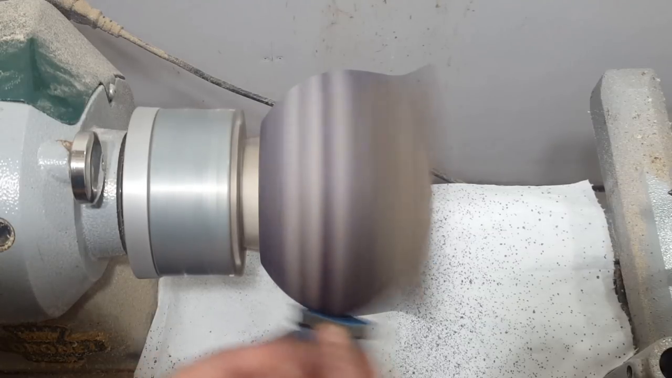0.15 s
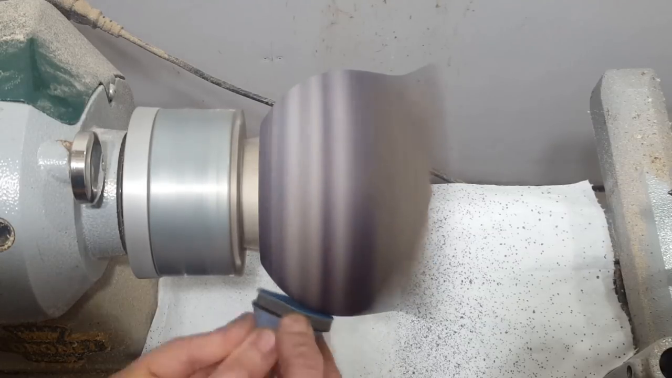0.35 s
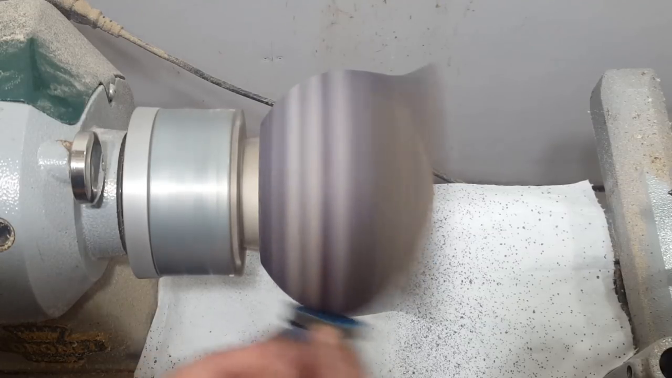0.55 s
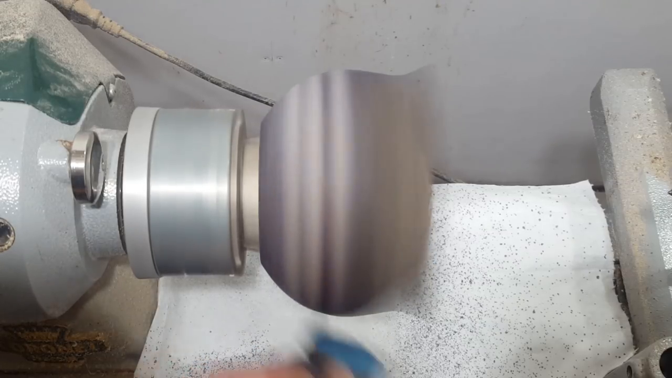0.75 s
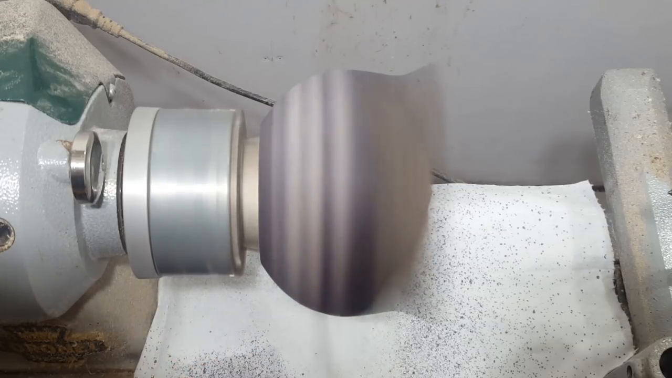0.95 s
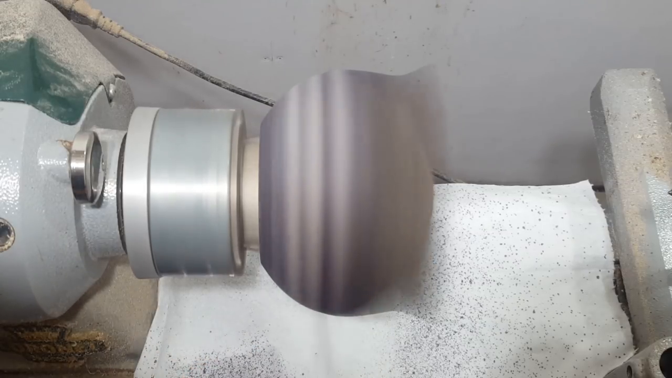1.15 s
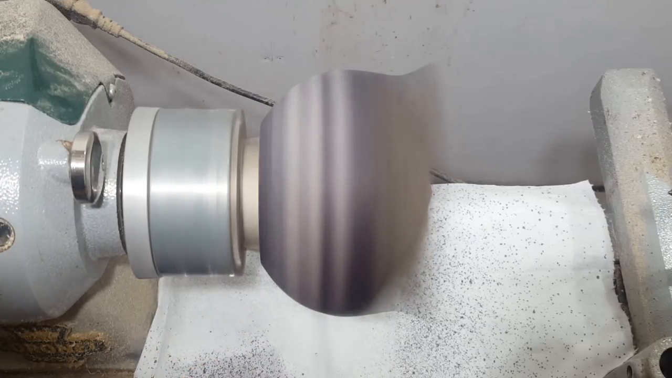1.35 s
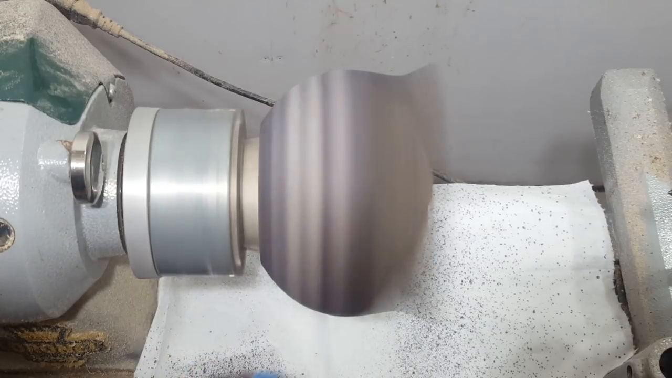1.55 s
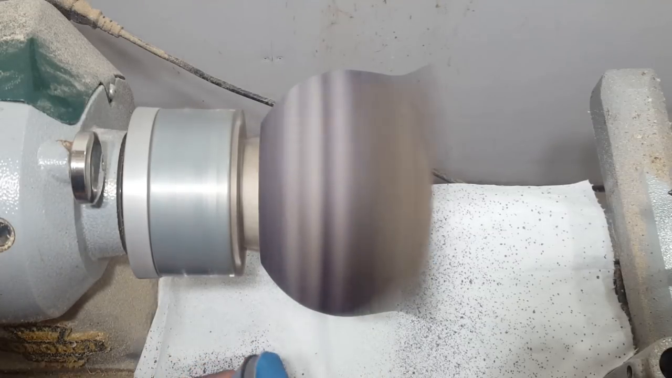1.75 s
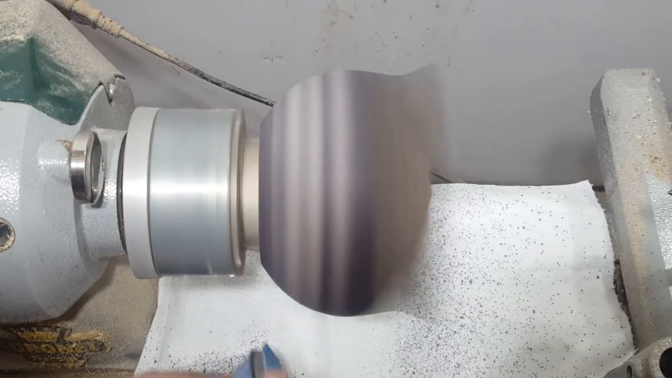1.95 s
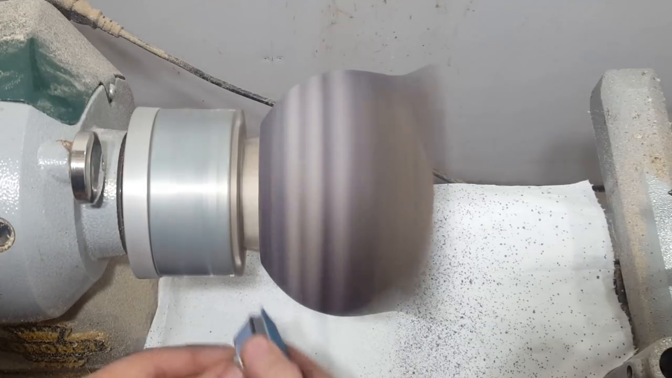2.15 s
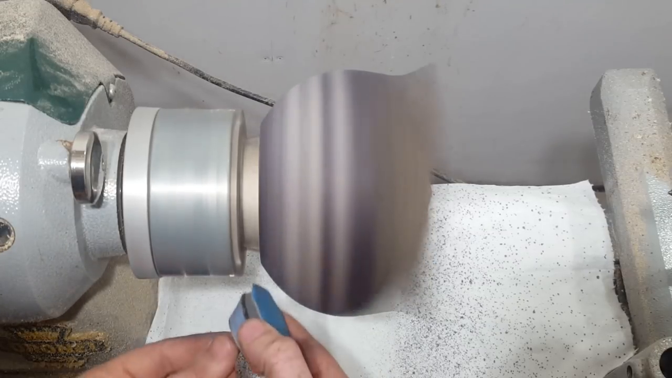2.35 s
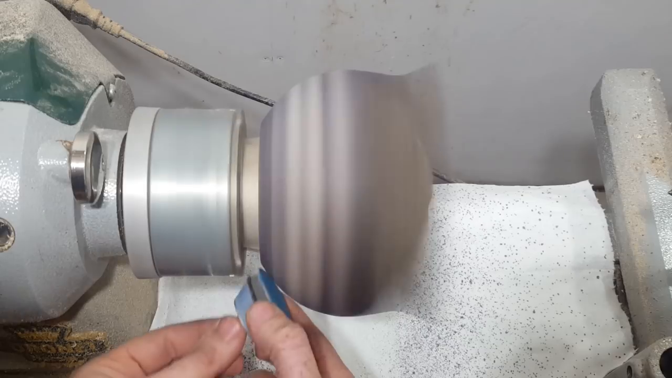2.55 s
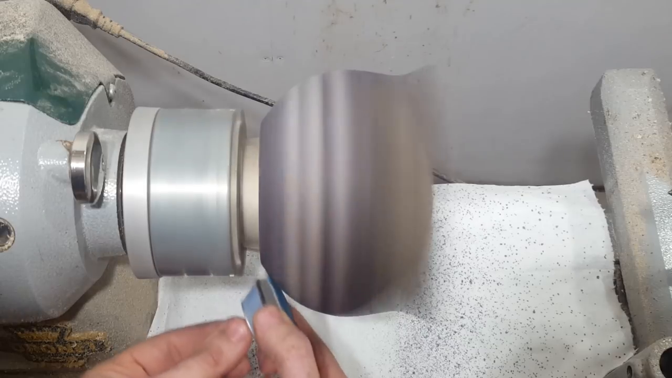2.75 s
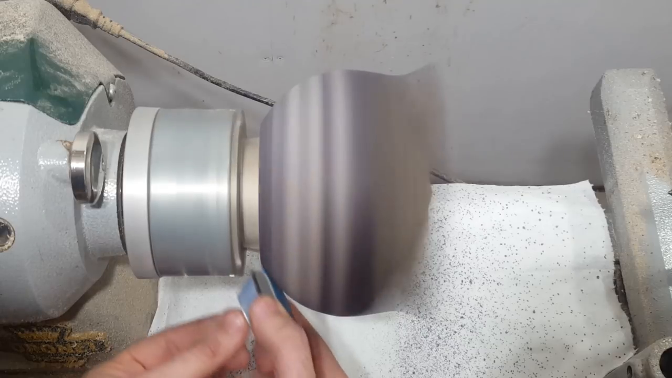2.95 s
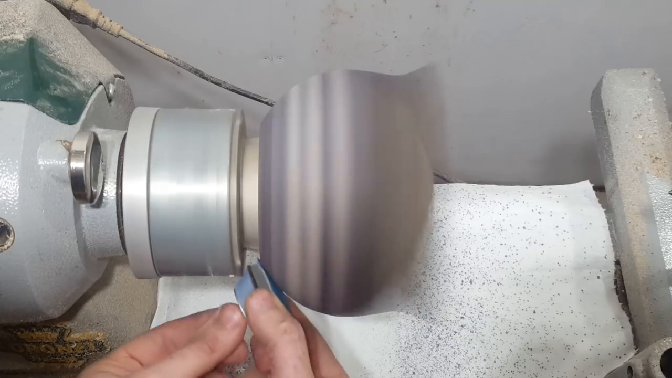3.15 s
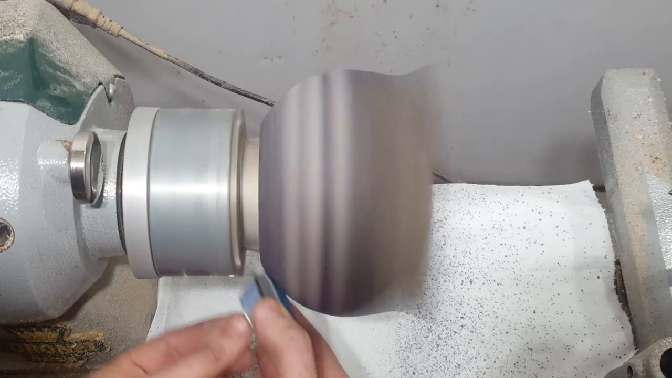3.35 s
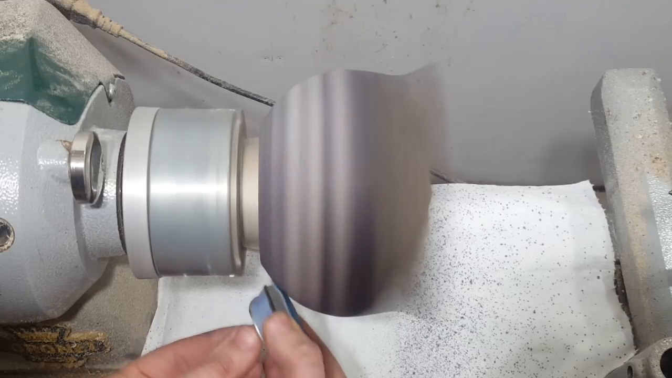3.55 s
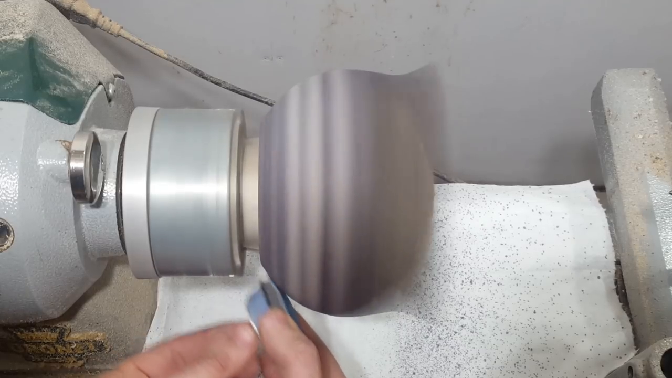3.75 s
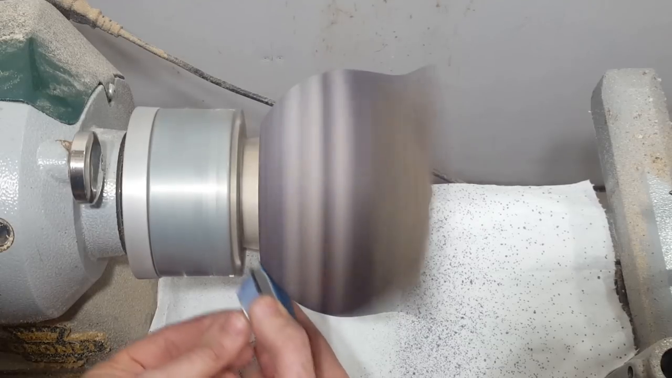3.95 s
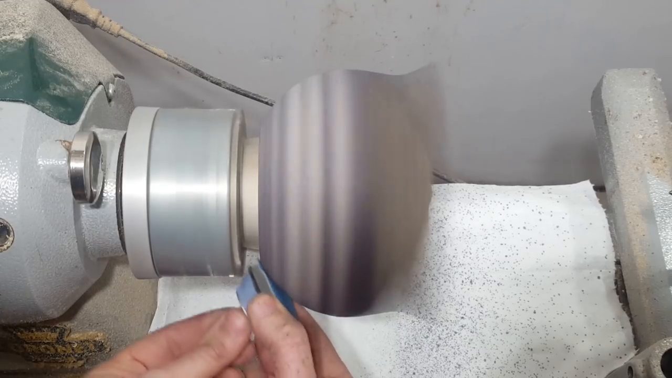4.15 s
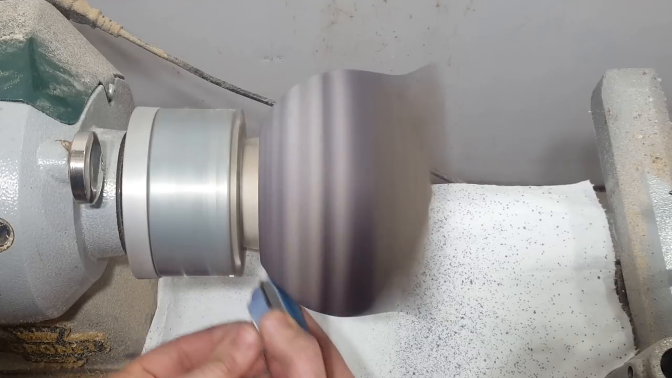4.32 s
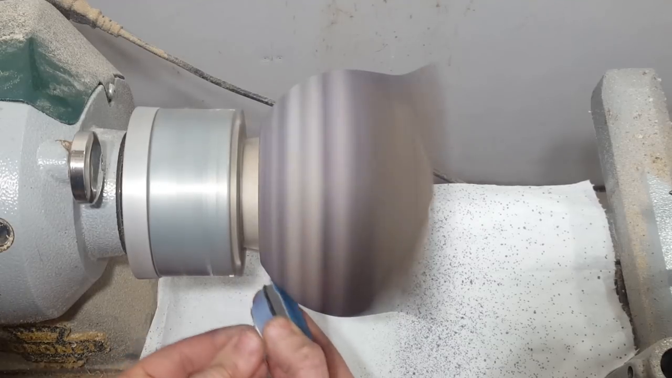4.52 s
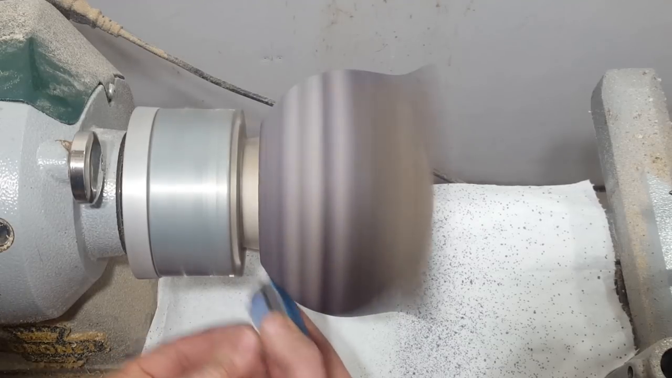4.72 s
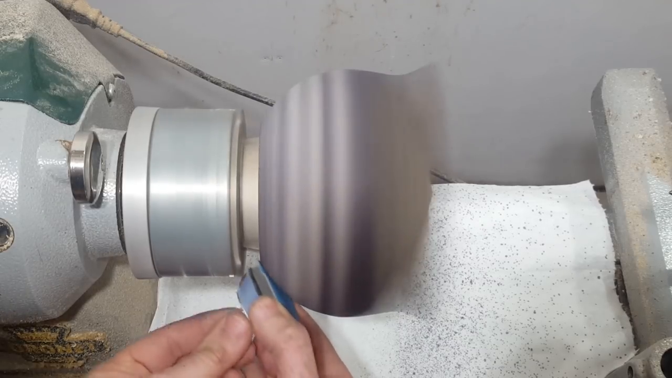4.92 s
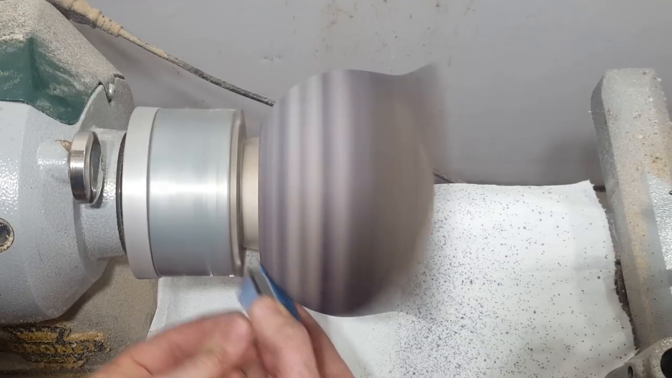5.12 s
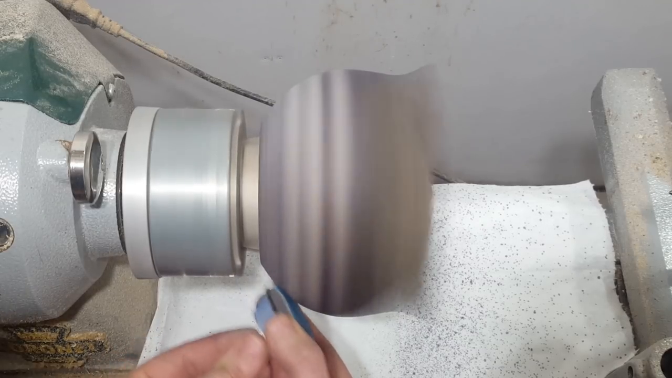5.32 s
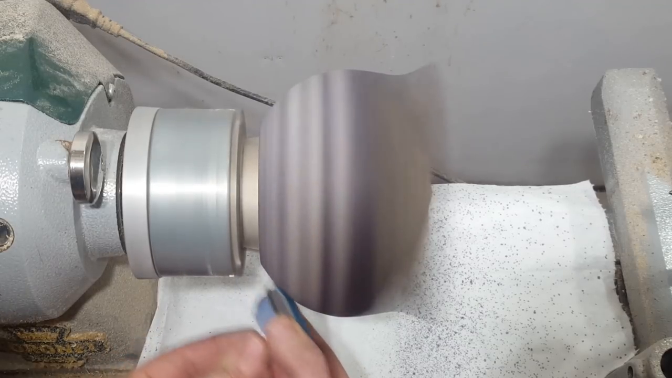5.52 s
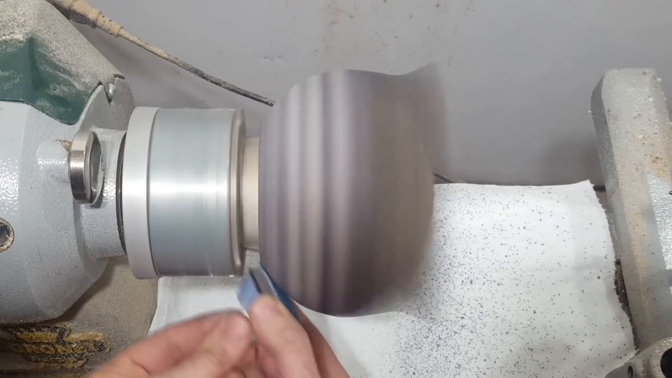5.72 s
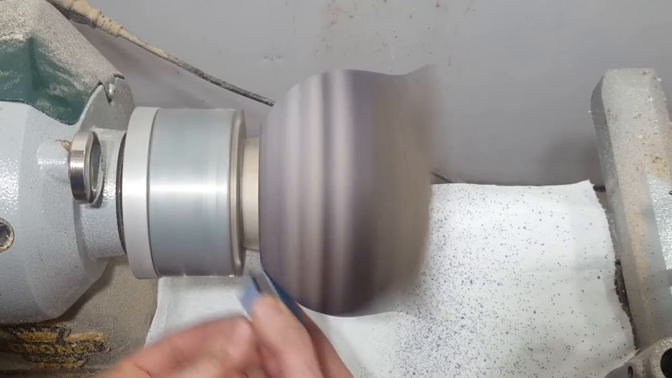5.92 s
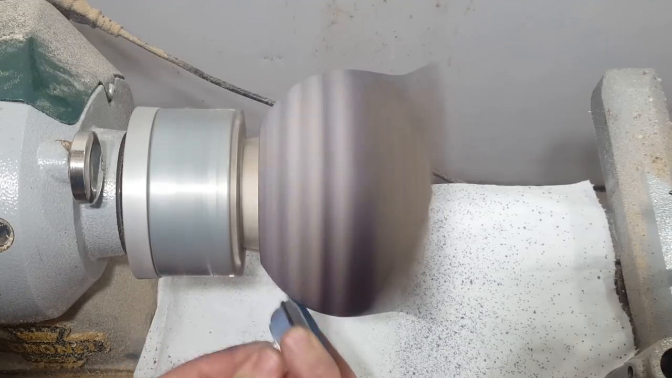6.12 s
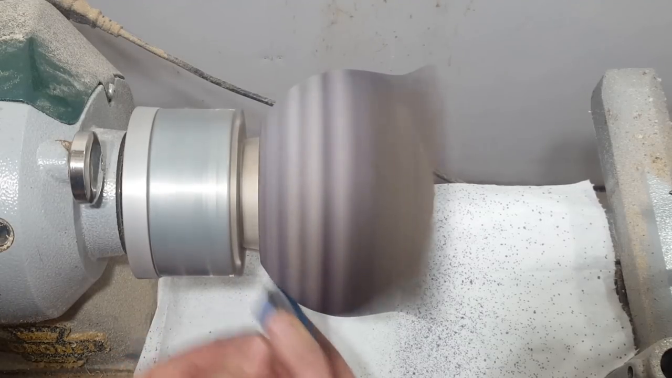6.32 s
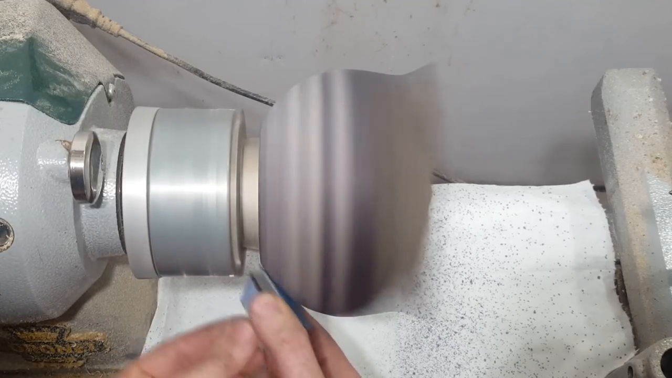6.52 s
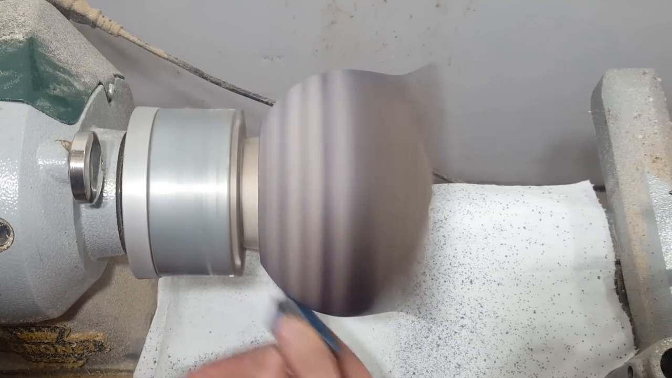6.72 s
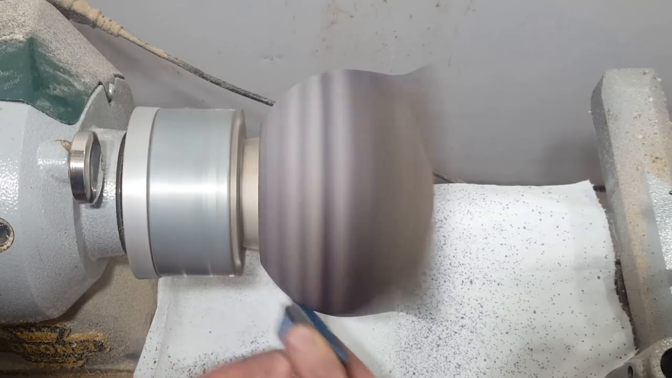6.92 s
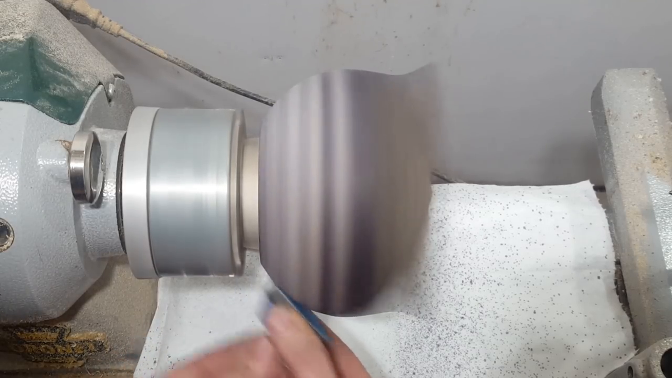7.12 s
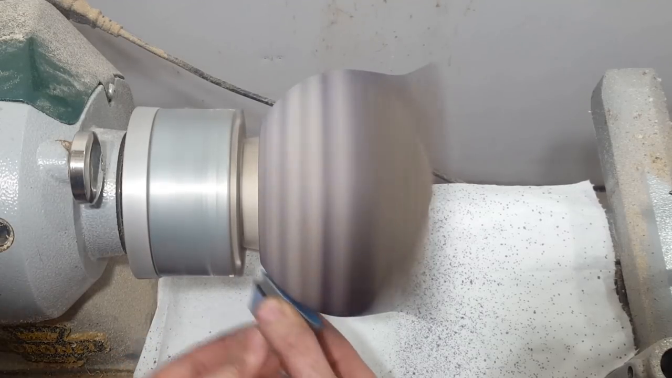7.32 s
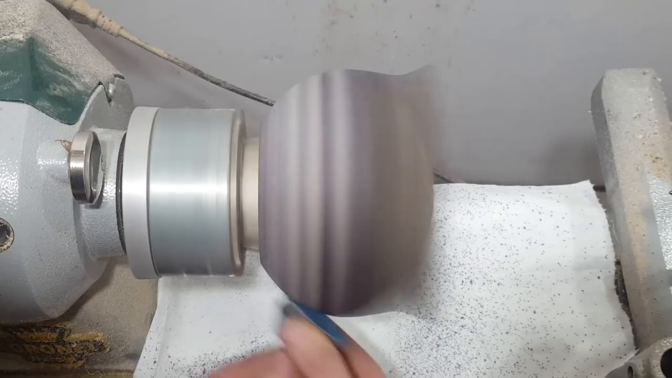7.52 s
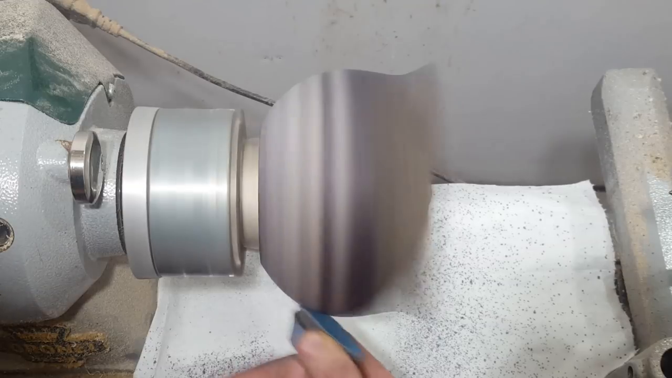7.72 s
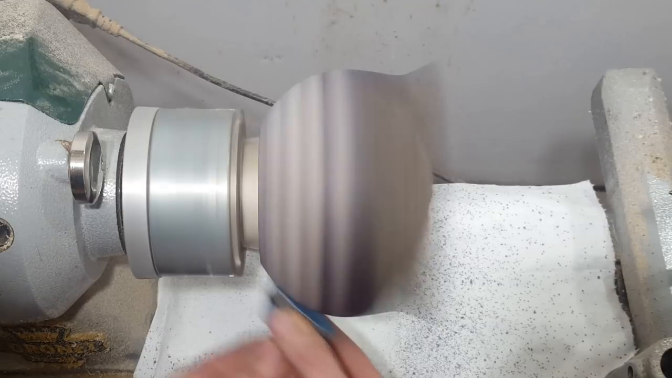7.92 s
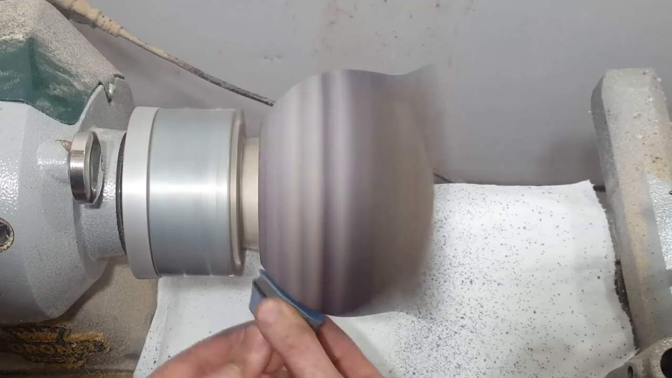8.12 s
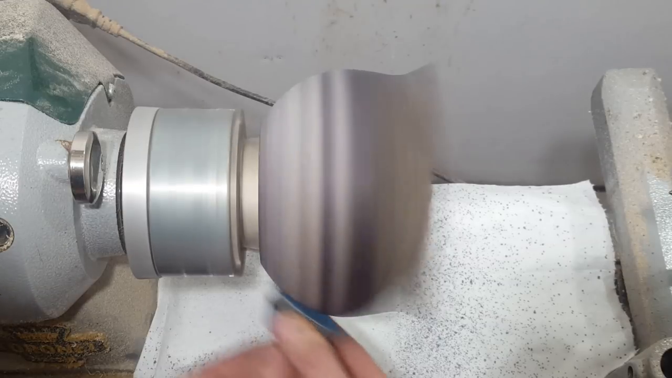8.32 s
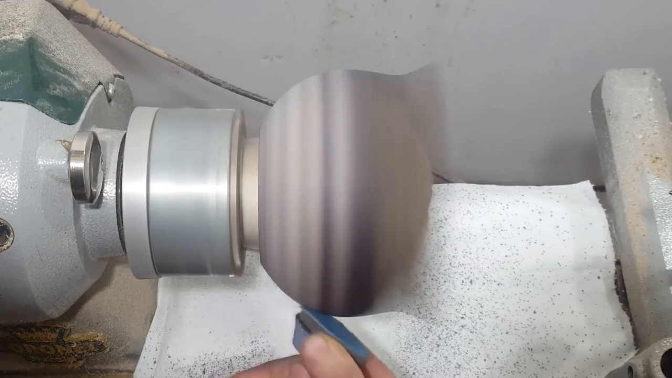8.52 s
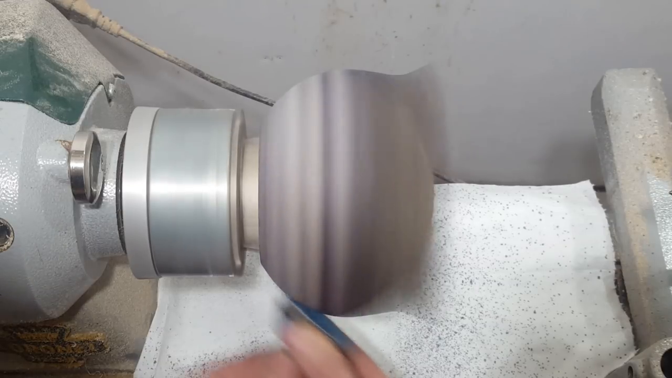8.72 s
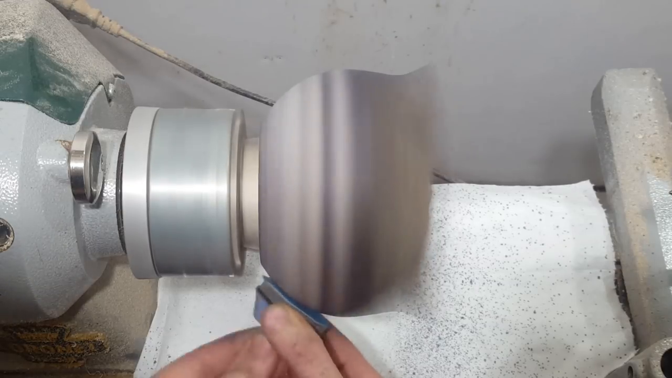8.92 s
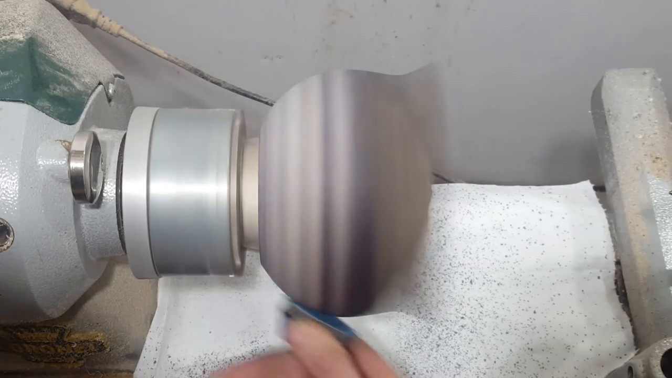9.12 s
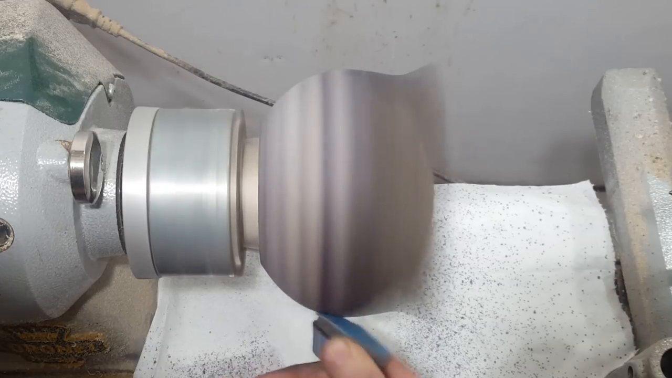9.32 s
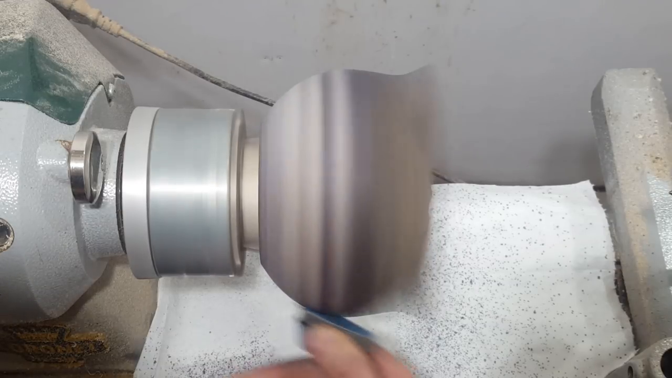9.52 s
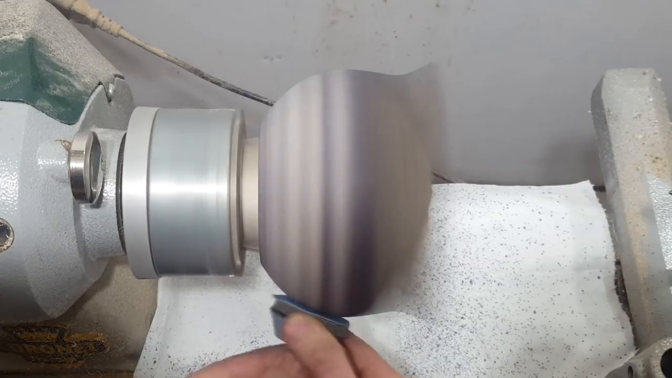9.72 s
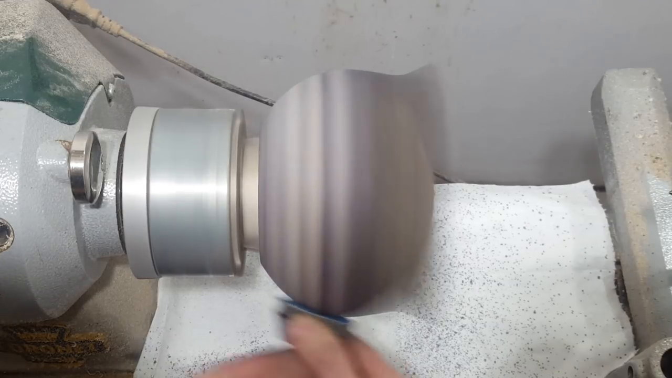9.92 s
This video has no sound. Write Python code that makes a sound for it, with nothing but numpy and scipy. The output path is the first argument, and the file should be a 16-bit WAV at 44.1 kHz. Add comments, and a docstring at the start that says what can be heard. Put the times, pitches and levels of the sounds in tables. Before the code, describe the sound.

A close stereo phone in a small, dry workshop hears a wooden bowl being sanded on a running lathe. From 0 to 0.8 seconds the pad makes a loud, bright, gritty rasp in quick uneven strokes, with sharp snags around 0.3 to 0.65 and a dull thud near 0.4. The pad lifts off; until about 2.6 only a much quieter, fluttering motor and belt hum remains, with low rumble, airy whirr, a thin high whine and faint bumps near 1.1 and 1.4. At 2.65 the scratching returns, thinner, in regular to-and-fro swishes of about a quarter second, finely pulsed by the fast rotation. Strokes swell most strongly around 6.8 to 8, with snags near 7.65. The rasp grows fuller and the low wooden thrum deepens towards 9, with snags near 8.9 and 9.7, and sanding continues to the end at about 10 seconds.

```python
"""Sanding a spinning bowl

A hand-held abrasive pad sweeps to and fro over a wooden bowl on a lathe, lifts off for about two seconds and returns.
Showers of tiny clicks make the scratch of the grit and the scrape of the wood, louder at end grain twice a turn.
Resonances and spindle multiples make the bowl thrum; a few bumps thud. Motor and belt hum throughout as fluttering tones
over shaped noise. Two microphone ports of a close phone hear it all in a small workshop."""
import sys
import numpy as np
from scipy import signal
from scipy.fft import rfft, irfft, next_fast_len
from scipy.io import wavfile
from scipy.ndimage import uniform_filter1d

SR = 44100
rng = np.random.default_rng(int(sys.argv[2]) if len(sys.argv) > 2 else 0)


def persist_wave(psi):
    """Save psi, clipped to +-1, as 16-bit WAV."""
    counts = np.round(np.clip(psi, -1, 1) * 32767).astype(np.int16)
    wavfile.write(sys.argv[1], SR, np.atleast_2d(counts).T)


N = 439236

# Sweeps of the hand, to and fro. Each row: start in seconds, length in seconds,
# share of the length at which the hand is fastest, swell of the rasp in dB.
HAND_STROKES = [(-.1, 0.22, .45, 1.5), (0.163, .11, 0.5, 4), (0.265, 0.16, 0.28, 3.5),
                (0.405, 0.15, 0.5, 3.5), (0.574, 0.13, 0.53, 4), (2.65, 0.21, 0.5, 7),
                (2.872, .22, 0.39, 8.5), (3.094, .24, 0.56, 8), (3.328, .28, 0.56, 6.5),
                (3.618, .24, 0.58, 7), (3.848, 0.29, 0.62, 6), (4.11, .23, 0.66, 7.5),
                (4.341, 0.28, 0.4, 6.5), (4.6, .23, 0.58, 6.5), (4.828, 0.25, 0.7, 6.5),
                (5.1, 0.25, .48, 6.5), (5.363, 0.25, 0.59, 7), (5.6, 0.32, 0.55, 5.5),
                (5.901, 0.25, 0.62, 8), (6.162, 0.29, 0.64, 6), (6.468, .27, 0.55, 8),
                (6.742, 0.26, 0.65, 11.5), (7.013, 0.25, .57, 10), (7.277, 0.26, 0.65, 9.5),
                (7.558, 0.24, 0.61, 9), (7.825, 0.24, .56, 8.5), (8.074, .26, 0.45, 8),
                (8.315, .26, 0.64, 7.5), (8.58, 0.27, 0.59, 6.5), (8.828, 0.29, 0.7, 5),
                (9.118, 0.25, 0.73, 5.5), (9.403, .26, 0.35, 6.5), (9.65, 0.31, 0.28, 7.5),
                (9.9, .26, .4, 7)]
# How the pad bears on the bowl as it works outward from the chuck. Each row: time in seconds,
# then levels before trim of the grit's rasp, the wood's scrape and the bowl's thrum, all in dB.
PAD_BEARING = [(0.0, -28.5, -48.5, -51.5), (.75, -33.5, -49.5, -52), (2.8, -41, -56, -62),
               (3.1, -39.5, -52.5, -76), (3.7, -37.5, -50.5, -69), (5.0, -35.5, -49, -64),
               (5.9, -36, -48.5, -61), (6.8, -38, -49, -58.5), (8.1, -33.9, -47.5, -56),
               (9.1, -32.5, -48, -52), (9.96, -34.5, -50.5, -51.5)]
# End grain meets the pad twice a turn, at a drifting angle. Each row: time in seconds, angle in turns,
# boost of the first patch in dB, boost of the opposite patch in dB.
END_GRAIN_PATCHES = [(.4, 0.29, 1, -1), (3.2, 0.22, 3.5, 5), (6.3, 0.24, 1, 2.5), (7.6, 0.3, 0, 3),
                     (9.1, 0.476, .5, 3), (9.9, 0.54, 3, 1)]
# Coarse grit catching in the wood. Each row: time in seconds, peak before trim in dB.
GRIT_SNAGS = [(0.1955, -20), (0.3084, -11.5), (0.4349, -21), (0.497, -9.5), (0.6155, -9.5), (0.6455, -13),
              (2.6773, -28), (2.9133, -15.5), (3.4526, -21), (7.64, -14), (7.6674, -17), (8.9101, -17),
              (9.6924, -12)]
# Colour of the scratching grit as the phone's microphone hears it.
# Each row: frequency in Hz, relative level in dB per Hz.
RASP_COLOUR = [(2600, -29), (4500, -18), (6400, -11), (7100, -6), (7850, 4), (8400, -0.5), (9100, -10),
               (9800, -15.5), (10600, -12.5), (11700, -6), (13400, -3), (15700, -3)]
# Colour of the wood under the grit. Each row: frequency in Hz, relative level in dB per Hz.
SCRAPE_COLOUR = [(600, -13), (1100, -15.5), (1550, -1.5), (3600, 3.5), (5200, -1), (8000, -35)]
# Rubbing of the pad's soft backing. Each row: frequency in Hz, relative level in dB per Hz.
RUB_COLOUR = [(350, -14), (650, 0.5), (1000, -11.5), (1450, 5.5), (2100, -8.5), (3500, -9)]
# Where the pad sits between the ports. Each row: time in seconds, left minus right in dB.
PAD_BALANCE = [(0.0, -1), (.6, -2.5), (2.7, -1.5), (4.0, -2), (5.1, -2.5), (6.0, -2.5), (6.75, -3),
               (7.9, -1.8), (9.9, -2.7)]
# Resonances of the bowl on its chuck. Each row: frequency in Hz,
# width in Hz (the -6 dB bandwidth is 2.3 times this), relative level in dB.
BOWL_MODES = [(101, 19, 0.5), (133, 11, 0), (154.5, 11.5, 5.5), (262, 110, -7)]
# Dull thuds of the bowl. Each row: time in seconds, thud of the bowl in dB, knock through the frame in dB.
BOWL_BUMPS = [(.075, -41, -51), (0.348, -54, -41), (.372, -37.5, -52), (1.13, -48, -60), (1.36, -53, -60),
              (3.76, -51, -58), (6.05, -49, -60), (8.21, -48, -56), (9.02, -44, -50)]
# Resonances of the lathe's frame. Each row: frequency in Hz, width in Hz (as for the bowl), relative level in dB.
FRAME_MODES = [(52, 26, 4), (140, 110, -18), (313, 60, -9.5), (452, 15.5, -1), (510, 19, -5.5),
               (620, 43, -21), (735, 57, -7)]
# Motor and belt tones running free. Each row: frequency in Hz, rms level before trim in dB.
FREE_RUNNING_TONES = [(137.3, -68), (156.1, -74), (261.1, -69), (282.6, -62), (293.4, -63), (444.1, -64.5),
                      (465.7, -60), (476.4, -72), (508.7, -75), (519.5, -60.5), (530.3, -69.5),
                      (541.0, -64), (573.3, -66), (594.9, -71.5), (605.6, -69.5), (627.2, -67),
                      (662.1, -79), (670.2, -68.5), (716.0, -69.5), (764.4, -73), (796.7, -67),
                      (1781.9, -70)]
# Motor and belt tones under load. Each row: frequency in Hz, rms level before trim in dB.
UNDER_LOAD_TONES = [(137.3, -70), (153.4, -68), (166.9, -74), (258.4, -64.5), (279.9, -62.5),
                    (290.7, -61.5), (441.4, -68.5), (460.3, -64.5), (471.0, -67.5), (503.3, -62.5),
                    (516.8, -60), (535.6, -57), (567.9, -65), (600.2, -65), (621.8, -65.5), (662.1, -72.5),
                    (732, -72.5), (770, -70), (788.7, -69)]
# Thin singing of the motor drive and bearings. Each row: frequency in Hz,
# width in Hz (as for the bowl), relative level in dB.
WHINE_MODES = [(7020, 90, -6), (7460, 120, 2.5), (8130, 240, -2.5), (12000, 70, 0), (12860, 130, -4),
               (14620, 170, -4), (15300, 110, -4), (15500, 100, -5)]
# Thin, fluttering whistle of the motor drive and whirr of the bearings.
# Each row: frequency in Hz, rms level in dB.
WHISTLE_TONES = [(1090, -78), (1530, -78), (1782, -73.5), (2256, -74.5), (2840, -80), (5020, -78.5),
                 (12000, -73)]
# Rumble and windage of the running lathe. Each row: frequency in Hz, relative level in dB per Hz.
WINDAGE_COLOUR = [(15, -28), (28, -3), (100, -13), (200, -4), (380, -13.5), (700, -13), (1000, -10.5),
                  (2400, -17.5), (3200, -18.5), (4200, -24.5), (6200, -24.5), (7700, -12), (10000, -35.5),
                  (13000, -18.5), (15700, -45)]
# Level balance of the microphone ports. Each row: frequency in Hz, left minus right in dB.
PORT_LEVELS = [(60, -5), (150, -5), (380, -2), (1290, -2), (2400, 1), (4400, 1), (6500, 2.5), (8100, 1.5),
               (12000, -3), (15000, -1.5)]
# Stereo phase. Each row: frequency in Hz, phase of left over right in radians; the top is nearly in phase.
STEREO_PHASE = [(100, 0), (600, .7), (1500, 1.2), (4400, 1.4), (6700, 2.2), (7400, 1.4), (7800, .1),
                (15000, 0)]
# Stereo spread. Each row: frequency in Hz, spread over centred sound in dB; the top is narrow.
STEREO_SPREAD = [(60, -22), (300, -13.5), (650, 4.5), (1400, 3.5), (3200, 6.5), (6500, -0.5), (8200, -9.5),
                 (15000, -10)]

SPINDLE_HZ = 16.72
LIFT_S, RETURN_S = 0.774, 2.643  # the pad starts to leave the bowl, starts to come back
LIFTING_S, LANDING_S = 0.041, 0.026
SHOP_T60_S = 0.14
TOP_HZ = 15750
TIME = np.arange(N) / SR
SIZE = next_fast_len(N + SR // 2, real=True)
FREQS = np.arange(SIZE // 2 + 1) * SR / SIZE + 1e-3  # kept off zero for the logarithms
# half of a left-minus-right difference goes to each channel
SIDES = np.array([[0.5], [-0.5]])


def sanding(ports, rasp_db=2.39, scrape_db=0.1, scrape_follow=0.39, snag_db=-9,
            rub_db=-4.5, rub_follow=0.76, rub_swell_share=0.061,
            rocking_db=6, rocking_hz=14, wear_db=5, count=8):
    """Bright scratching of the grit over the duller scrape of the wood, from several spots of the pad."""
    grit_db, wood_db, _ = curves(PAD_BEARING)
    swell_db = sweeps()
    touch = contact(LIFTING_S, LANDING_S) ** 2
    wood = surface()
    rasp_level = undb(grit_db + swell_db + rasp_db) * wood * catches() * touch
    snags = undb(snag_db) * surges(GRIT_SNAGS, decay_s=0.011, rise_s=0.00072)
    bite = np.hypot(rasp_level, snags)
    drag = undb(wood_db + scrape_follow * swell_db + scrape_db) * wood * catches() * touch
    bright = unit(undb(over_hz(RASP_COLOUR)))
    dull = unit(undb(over_hz(SCRAPE_COLOUR)))

    # the pad rocks in the fingers, so the load wanders between its spots and the colour shifts
    loads = undb([rocking_db * walk(rocking_hz) for _ in range(count)])
    loads /= np.sqrt((loads ** 2).sum(0))
    treble = np.clip(np.log2(FREQS / 8000), 0, 1)
    heard = 0
    # each spot scratches on its own and has its own paths to the phone
    for load, lean in zip(loads, np.linspace(-1, 1, count)):
        # some spots of the pad are sharper, some more worn
        colour = unit(bright * undb(lean * wear_db * treble))
        rasp = colour * rfft(load * bite * grit(rate=6600, spread_db=2.0), SIZE)
        scrape = dull * rfft(load * drag * grit(rate=1500, spread_db=5.0), SIZE)
        heard = heard + (rasp + scrape) * workshop(ports)
    pan_db, = curves(PAD_BALANCE)
    scratching = irfft(heard, SIZE)[:, :N] * undb(SIDES * pan_db)

    # the soft backing rubs lower and more evenly than the grit bites
    press = undb(wood_db + rub_swell_share * swell_db + rub_db) * unit(wood ** rub_follow) * touch
    rub_response = unit(undb(over_hz(RUB_COLOUR))) * workshop(ports)
    rub = filtered(press * grit(rate=1500, spread_db=4.5), rub_response)
    return scratching + rub


def sweeps(sharpness=1.27):
    """Swell in dB: in each stroke the hand speeds up from one turn and slows into the next."""
    db = np.zeros(N)
    for start, length, fastest, swell_db in HAND_STROKES:
        corners = start + length * np.array([0, np.clip(fastest, 0.1, 0.9), 1])
        progress = np.interp(TIME, corners, [0, 1, 0])
        db += swell_db * np.sin(np.pi / 2 * progress) ** sharpness
    return db


def contact(lifting_s, landing_s):
    """1 while the pad is on the bowl, 0 while it is off, with a ramp each way."""
    before_lift = np.clip(1 - (TIME - LIFT_S) / lifting_s, 0, 1)
    after_return = np.clip((TIME - RETURN_S) / landing_s, 0, 1)
    return before_lift + after_return


def surface(entry_turns=0.014, exit_turns=0.11, fibre_db=0.94, flutter_db=0.1, count=48):
    """Gain of the wood passing under the pad: end grain and fibre marks come round every turn."""
    turns = SPINDLE_HZ * TIME
    first, first_db, second_db = curves(END_GRAIN_PATCHES)
    db = 0
    for angle, strength_db in ((first, first_db), (first + 0.5, second_db)):
        past = (turns - angle + 0.5) % 1 - 0.5
        # the grit bites into end grain quickly and leaves it slowly
        width = np.where(past < 0, entry_turns, exit_turns)
        db = db + strength_db * np.exp(-0.5 * (past / width) ** 2)
    # the fibre pattern changes as the pad moves along the bowl
    mark_turns = np.arange(count) / count
    marks = [np.interp(turns, mark_turns, rng.standard_normal(count), period=1) for _ in range(2)]
    place = walk(1.16)
    db = db + fibre_db * (np.cos(place) * marks[0] + np.sin(place) * marks[1])
    return unit(undb(db + flutter_db * walk(220)))


def catches(rate=45, spread_db=6.0, release_s=0.0073, share=0.14):
    """Grains catch suddenly, rate times a second on average, and let go: small sharp-edged surges."""
    sizes = undb(spread_db * np.minimum(rng.exponential(size=N), 2.5))
    starts = (rng.random(N) < rate / SR) * sizes
    release = np.exp(-1 / (release_s * SR))
    return unit(1 + share * signal.lfilter([1], [1, -release], starts))


def grit(rate, spread_db):
    """Dense tiny fractures of wood fibre, rate a second on average, a few much larger than the rest."""
    chance, side = rng.random((2, N))
    share = rate / SR
    hit = np.flatnonzero(chance < share)
    # below the threshold the chance is even, so its logarithm gives exponential sizes
    size_db = spread_db * np.minimum(-np.log(chance[hit] / share), 5)
    out = np.zeros(N)
    out[hit] = np.sign(side[hit] - 0.5) * undb(size_db)
    return unit(out)


def thrum(ports, level_db=-2.5, noise_db=-2, throb=0.22, stroke_follow=0.2, idle_db=-65,
          dying_s=0.16, building_s=0.05, count=18):
    """The bowl shudders under the pad at multiples of the spindle rate, over noise in its resonances."""
    _, _, shake_db = curves(PAD_BEARING)
    pressed = undb(shake_db + stroke_follow * sweeps()) * contact(dying_s, building_s)
    twice_a_turn = 1 + throb * np.cos(4 * np.pi * SPINDLE_HZ * TIME)
    shake = undb(level_db) * np.hypot(pressed, undb(idle_db)) * twice_a_turn
    body = resonances(BOWL_MODES)
    orders_hz = SPINDLE_HZ * np.arange(count)[6:]
    orders_db = 20 * np.log10(np.interp(orders_hz, FREQS, body))
    lines = tones(zip(orders_hz, orders_db), ports, waver=0.47)
    return (unit(lines) + undb(noise_db) * steady(body, ports)) * shake


def bumps(ports):
    """A bump rings two of the bowl's low resonances, near 133 and 154 Hz, and knocks briefly through the frame."""
    ringing = unit(tones([(hz, db) for hz, _, db in BOWL_MODES[1:3]], ports, waver=0.2))
    thuds = surges([(s, db) for s, db, _ in BOWL_BUMPS], decay_s=0.022, rise_s=0.0046)
    knocks = surges([(s, db) for s, _, db in BOWL_BUMPS], decay_s=0.014, rise_s=0.0018)
    return ringing * thuds + steady(resonances(FRAME_MODES), ports) * knocks


def surges(events, decay_s, rise_s):
    """Envelope of quick swells that peak at the given times and die away."""
    out = np.zeros(N)
    for s, db in events:
        age = np.maximum(TIME - s + rise_s, 0)
        rise = np.minimum(age / rise_s, 1)
        out += undb(db) * rise * np.exp(-np.maximum(age - rise_s, 0) / decay_s)
    return out


def lathe(ports, free_db=1, loaded_db=1, frame_db=-59, windage_db=-56, load_db=1,
          freeing_s=0.13, loading_s=0.41):
    """Motor and belt hum through the frame; their tones shift when the pad loads the spindle."""
    load = contact(freeing_s, loading_s)
    free_tones = tones(FREE_RUNNING_TONES, ports, waver=0.46, skirt_hz=6.0)
    loaded_tones = tones(UNDER_LOAD_TONES, ports, waver=0.85, skirt_hz=4.5)
    free = np.sqrt(1 - load) * undb(free_db) * free_tones
    loaded = np.sqrt(load) * undb(loaded_db) * loaded_tones
    frame = steady(resonances(FRAME_MODES), ports) * undb(frame_db + load_db * load)
    once_a_turn_db = 0.61 * np.cos(2 * np.pi * SPINDLE_HZ * TIME)
    windage_level = undb(windage_db + 0.5 * walk(3.7) + once_a_turn_db)
    windage = steady(undb(over_hz(WINDAGE_COLOUR)), ports) * windage_level
    whine = undb(-61.7) * steady(resonances(WHINE_MODES), ports)
    whistle = tones(WHISTLE_TONES, ports, waver=0.8, skirt_hz=12)
    return free + loaded + frame + windage + whine + whistle


def tones(lines, ports, waver, skirt_hz=6, size=400):
    """Machine tones: each is a steady line with a narrow skirt of chance that makes it flutter."""
    centred, spread = ports
    spectrum = np.zeros((2, len(FREQS)), complex)
    for hz, db in lines:
        k = int(round(hz * SIZE / SR))
        near = slice(k - size, k + size)
        chance = rng.standard_normal((2, 2 * size))
        turns = np.exp(2j * np.pi * rng.random(3))
        line = (chance[0] + 1j * chance[1]) * np.exp(-0.5 * ((FREQS[near] - hz) / skirt_hz) ** 2)
        line *= waver / np.linalg.norm(line)
        line[size] += turns[0]
        # each tone reaches the ports with its own standing-wave pattern
        port = centred[:, k] + 0.5 * spread[:, k] * turns[1:]
        pattern = np.outer(port / np.linalg.norm(port), line / np.linalg.norm(line))
        spectrum[:, near] += undb(db) * pattern
    return SIZE * irfft(spectrum, SIZE)[:, :N]


def steady(response, ports):
    """Stereo noise of a given colour; the mean of its two channels has rms 1."""
    centred, spread = ports
    noise = rfft(rng.standard_normal((3, SIZE)))
    pair = irfft((centred * noise[0] + spread * noise[1:]) * response, SIZE)[:, :N]
    return pair / pair.mean(0).std()


def resonances(modes):
    """Gain of a set of steep-sided resonances, summed in power."""
    power = 0
    for hz, width, db in modes:
        detuning = (FREQS / hz - hz / FREQS) * hz / width / 2.3
        power = power + undb(2 * db) / (1 + detuning ** 2) ** 2
    return np.sqrt(power)


def workshop(ports, near_s=0.01, near_db=9):
    """Response from one spot on the pad: bowl and wall throw the sound back at once, the room adds a short tail."""
    t = TIME[:SR // 3]
    decay = undb(-60 * t / SHOP_T60_S) + undb(near_db) * np.exp(-t / near_s)
    echoes = rng.standard_normal((2, len(t))) * decay * (t > 0.0006)
    echoes /= np.sqrt((echoes ** 2).sum(1, keepdims=True))
    centred, spread = ports
    return centred + spread * rfft(echoes, SIZE)


def port_gains():
    """Gain of both ports for centred sound and for its stereo spread, levelled by their common power."""
    width = undb(over_hz(STEREO_SPREAD))
    phase = np.exp(1j * SIDES * over_hz(STEREO_PHASE))
    tilt = undb(SIDES * over_hz(PORT_LEVELS))
    centred_power = np.abs((tilt * phase).mean(0)) ** 2
    level = np.sqrt(centred_power + width ** 2 * (tilt ** 2).mean(0) / 2)
    return tilt * phase / level, tilt * width / level


def walk(rate):
    """Smooth chance of rms 1, heading for a new random value rate times a second."""
    k = max(int(SR / rate), 2)
    count = N // k + 2
    path = np.interp(TIME, np.arange(count) * k / SR, rng.standard_normal(count))
    return unit(uniform_filter1d(path, k // 2))


def curves(rows):
    """Each column of a timed table, sample by sample."""
    s, *columns = np.transpose(rows)
    return [np.interp(TIME, s, c) for c in columns]


def over_hz(points):
    """Join (Hz, value) points on a log-frequency axis."""
    hz, value = np.transpose(points)
    return np.interp(np.log(FREQS), np.log(hz), value)


def filtered(x, response):
    """Apply a frequency response."""
    return irfft(rfft(x, SIZE) * response, SIZE)[..., :N]


def undb(db):
    """Decibels to gain."""
    return 10 ** (np.asarray(db) / 20)


def unit(x):
    """Scale to rms 1."""
    return x / np.sqrt(np.mean(x ** 2))


def scene():
    """Pad, bowl and machine together."""
    ports = port_gains()
    return sanding(ports) + thrum(ports) + bumps(ports) + lathe(ports)


def record(dry):
    """The phone cuts the top with a steep low-pass."""
    top_cut = signal.ellip(12, 0.1, 80, TOP_HZ, fs=SR, output="sos")
    return signal.sosfilt(top_cut, dry)


dry = scene()
out = record(dry)
persist_wave(out)
```